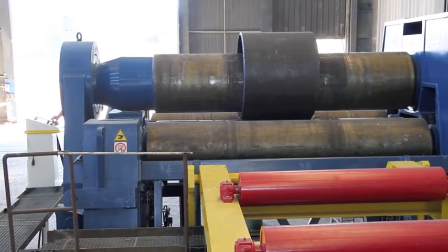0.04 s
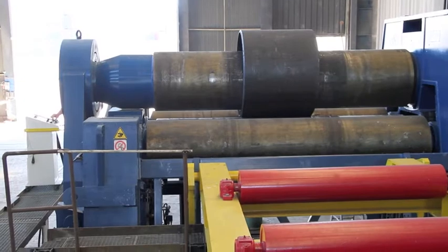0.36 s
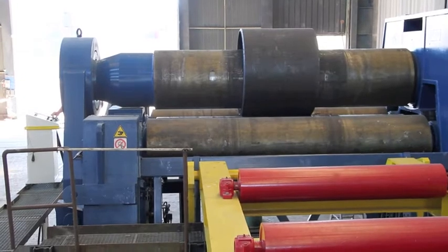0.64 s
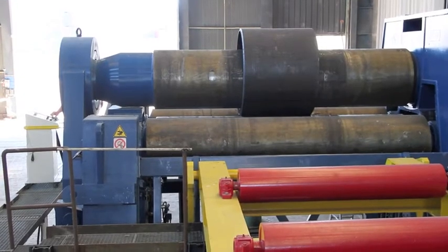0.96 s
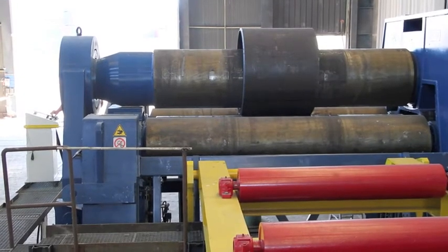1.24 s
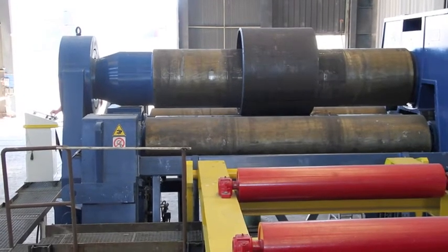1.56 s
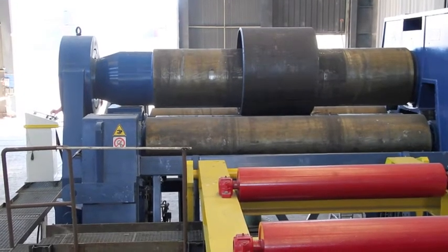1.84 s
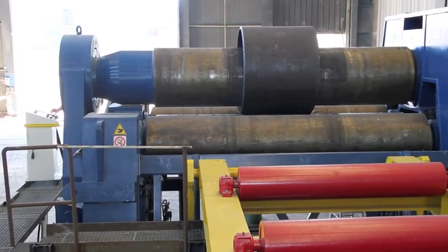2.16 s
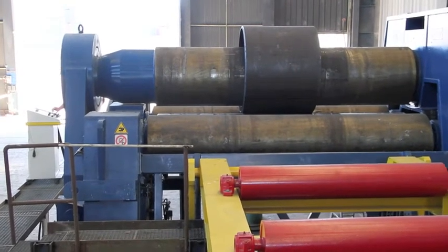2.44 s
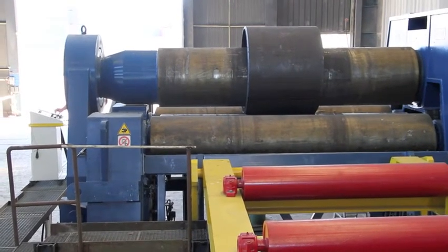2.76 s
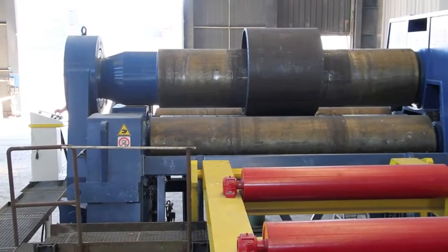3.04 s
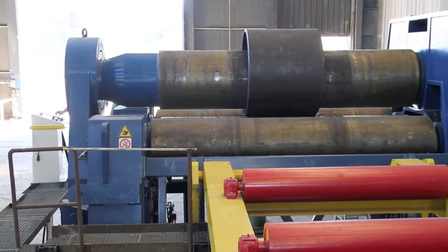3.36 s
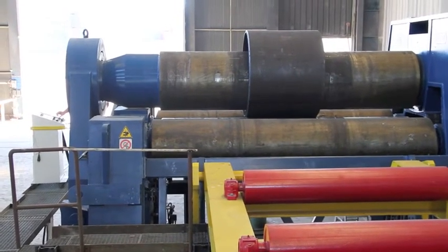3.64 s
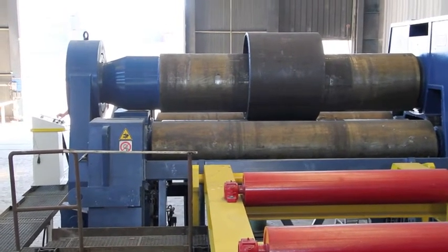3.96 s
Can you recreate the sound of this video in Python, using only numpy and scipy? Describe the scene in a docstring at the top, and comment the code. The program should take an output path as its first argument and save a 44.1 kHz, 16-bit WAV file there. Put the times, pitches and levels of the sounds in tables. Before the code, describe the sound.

A plate rolling machine's hydraulic pump gives a strong, steady hum with whining overtones throughout, a few metres away, over the fainter drone of a large factory hall. At about 0.6 seconds a soft hiss opens and stays, surging slightly around 2.3 seconds. From about 3.1 seconds to the end at 4, several very short, high, raspy squeaks fall in pitch and echo, the first being the loudest.

```python
"""A plate rolling machine in a large factory hall, the microphone a few metres from the rolls.
From the start its hydraulic pump gives a strong steady hum with a ladder of whining overtones;
a slower motor and other machines drone beneath, in the wash of the hall.
Within the first second a hiss opens, probably oil through a valve, and stays on.
Near the end come a few short falling squeaks, which echo in the hall."""
import sys
import numpy as np
from scipy import signal
from scipy.fft import rfft, irfft, next_fast_len
from scipy.io import wavfile
from scipy.ndimage import uniform_filter1d, map_coordinates

SR = 44100
rng = np.random.default_rng(int(sys.argv[2]) if len(sys.argv) > 2 else 0)


def int16_out(signal):
    """Quantize to a 16-bit WAV file."""
    q = np.round(np.clip(np.atleast_2d(signal).T, -1, 1) * 32767)
    wavfile.write(sys.argv[1], SR, q.astype(np.int16))


N = 176400


def amp(db):
    """Decibels to gain."""
    return 10 ** (np.asarray(db) / 20)


def unit(x):
    """Scale to rms 1."""
    return x / np.sqrt(np.mean(x ** 2) + 1e-20)


def curve(rows):
    """Points (t/s, value) joined by straight lines, one value per sample."""
    return np.interp(np.arange(N) / SR, *np.transpose(rows))


def wobble(rate):
    """A smooth random curve, rate knots a second."""
    return map_coordinates(rng.standard_normal(1000), [np.arange(N) * rate / SR + 2], mode="wrap")


def filtered(x, response):
    """Shape the spectrum of x by a gain that depends on frequency."""
    size = next_fast_len(N + SR // 2)
    return irfft(rfft(x, size) * response(np.fft.rfftfreq(size, 1 / SR)), size)[:N]


def rush(spectrum, patchy_db):
    """Noise of rms 1, coloured by rows of (f/Hz, level/dB), with patches of random gain."""
    bins = signal.stft(rng.standard_normal(N), nperseg=512)[2]
    patches = uniform_filter1d(rng.standard_normal(bins.shape), size=6, axis=0)
    patches = uniform_filter1d(patches, size=14, axis=1)
    noise = signal.istft(bins * amp(patchy_db * unit(patches)), nperseg=512)[1][:N]
    f, db = np.transpose(spectrum)
    return unit(filtered(noise, lambda hz: amp(np.interp(np.log(hz + 1), np.log(f + 1), db))))


def turning(hz, spread_hz):
    """Phase of something that turns at a slightly unsteady rate."""
    return 2 * np.pi * np.cumsum(hz + spread_hz * wobble(5.1)) / SR


def tone(phase, db, waver_db):
    """One partial of rms level db that wavers as it crosses the hall."""
    return np.sqrt(2) * amp(db + waver_db * wobble(6.86)) * np.sin(phase + 2 * np.pi * rng.random())


def hall():
    """The diffuse wash of all the machines in the hall, swelling slightly now and then."""
    # colour of the wash: f/Hz, relative level/dB
    colour = [(25, -80.5), (60, -68), (110, -61), (150, -52), (200, -52), (330, -50.5), (450, -53),
              (700, -56.5), (1100, -55.5), (1500, -58), (2100, -60), (2700, -64), (3600, -67), (5000, -73),
              (8000, -78), (12000, -79.5), (15500, -91)]
    # course of the wash: t/s, level/dB
    levels = [(0, -22.5), (1.0, -23), (1.04, -20.8), (1.3, -22.5), (2.3, -22.5), (3.1, -22), (3.6, -22),
              (3.71, -20.5), (3.76, -22.5), (3.9, -20.5), (4, -20.5)]
    return amp(curve(levels) + 0.27 * wobble(8)) * rush(colour, patchy_db=0.3)


def machinery(motor_hz=46.1):
    """A slow motor hums at multiples of its shaft rate; other machines drone at their own pitches."""
    # motor partials: multiple of the shaft rate, level/dB
    orders = [(1, -52), (2, -44.5), (3, -40)]
    # tones of the other machines: f/Hz, level/dB
    drones = [(155, -40), (170.5, -32.5), (225, -42), (616, -45.5), (808.8, -36.5), (938, -45.5)]
    shaft = turning(motor_hz, spread_hz=0.2)
    motor = sum(tone(order * shaft, db, waver_db=0.5) for order, db in orders)
    return motor + sum(tone(turning(hz, spread_hz=0.51), db, waver_db=2) for hz, db in drones)


def valve(attack_s=0.061, release_s=0.08):
    """A hiss that opens and follows the flow, with surges of brighter fizz on top."""
    # colour of the hiss: f/Hz, relative level/dB
    hiss_colour = [(1200, -86), (3600, -74.5), (5000, -74), (6500, -76.5), (8000, -78), (10000, -78),
                   (12000, -81), (13500, -87), (15300, -96.5)]
    # course of the hiss: t/s, level/dB
    hiss_levels = [(0, -38), (.3, -62), (.58, -48), (.68, -39), (.82, -32.5), (.95, -33), (1.45, -34.5),
                   (2.22, -34), (2.38, -31), (2.72, -33), (3.06, -34.5), (3.15, -32.5), (3.3, -33),
                   (3.55, -34.5), (4, -32.5)]
    # colour of the fizz: f/Hz, relative level/dB
    fizz_colour = [(4000, -22), (7000, -6), (11300, -1), (13500, -10), (15500, -25)]
    # surges of fizz: t/s, length before release/s, level/dB
    surges = [(0.618, .22, -38), (2.25, 0.48, -42), (3.08, .11, -39)]
    t = np.arange(N) / SR
    fizz_gain = np.zeros(N)
    for start, length, db in surges:
        rise = (t - start) / attack_s
        fall = 1 + (start + length - t) / release_s
        fizz_gain += amp(db) * np.clip(np.minimum(rise, fall), 0, 1)
    hiss = amp(curve(hiss_levels) + 0.27 * wobble(14)) * rush(hiss_colour, patchy_db=0.6)
    return hiss + fizz_gain * rush(fizz_colour, patchy_db=1.7)


def squeaks(fall_octaves=0.244):
    """Short, rasping, falling whistles that swell and break off."""
    # squeaks: t/s, length/s, starting f/Hz, whistle level/dB, rasp against whistle/dB
    events = [(3.149, 0.031, 3330, -22, -8), (3.196, 0.0228, 3400, -28, 2), (3.272, 0.0326, 3200, -31.5, 4),
              (3.346, 0.029, 3250, -30, -6), (3.488, .03, 3300, -33.5, 4), (3.518, 0.0246, 3380, -28.5, -7),
              (3.692, .035, 3300, -33, 1), (3.86, .025, 3100, -33, -7)]
    # colour of the rasp: f/Hz, relative level/dB
    rasp_colour = [(1500, -27), (2130, -1), (2350, -3), (2600, -1), (3050, -8), (3600, -12), (4020, -8),
                   (5000, -29)]
    out = np.zeros(N + SR)
    rasp = rush(rasp_colour, patchy_db=-2.5)
    jitter = 1 + 0.0094 * wobble(400)
    for start, length, hz, db, rasp_db in events:
        progress = np.linspace(0, 1, int(length * SR))
        at = round(start * SR) + np.arange(len(progress))
        envelope = np.interp(progress, [0, 0.8, 1], [0, 1, 0]) ** 0.48
        pitch_hz = hz * jitter[at] * 2 ** (-fall_octaves * progress)
        whistle = np.sqrt(2) * np.sin(2 * np.pi * np.cumsum(pitch_hz) / SR)
        out[at] += amp(db) * envelope * (whistle + amp(rasp_db) * rasp[at])
    return out[:N]


def echo(x, gain_db=1, t60_s=1.7, delay_s=0.017):
    """The long answer of the hall's walls, reaching the microphone just after the direct sound."""
    t = np.arange(2 * SR) / SR
    tail = rng.standard_normal(len(t)) * amp(-60 * t / t60_s) * (t > delay_s)
    return amp(gain_db) * signal.fftconvolve(x, tail / np.linalg.norm(tail))[:N]


def pump(pumping_hz=249.6, hum_gain_db=0.5, whine_gain_db=-0.5):
    """The hydraulic pump's pressure ripple: one strong hum and weaker overtones locked to it."""
    # pump partials, the hum first: multiple of the pumping rate, level before gain/dB
    orders = [(1, -15), (3, -45.5), (4, -29.5), (6, -32.5), (7, -46.5), (8, -48), (9, -34.6), (11, -44),
              (13, -44.5), (15, -44), (16, -52.5), (17, -50), (20, -54), (26, -55)]
    # slight swells and dips of the hum: t/s, relative level/dB
    swells = [(0.04, -15), (2.2, -14.5), (2.33, -15.5), (2.39, -14), (2.77, -16), (3.09, -15.5),
              (3.13, -13.5), (3.22, -16), (3.89, -14), (3.96, -14.5)]
    phase = turning(pumping_hz, spread_hz=0.027)
    swell_db = curve(swells) - curve(swells).mean()
    hum = tone(phase, orders[0][1] + hum_gain_db + swell_db, waver_db=0.05)
    whine = sum(tone(order * phase, db + whine_gain_db, waver_db=0.27) for order, db in orders[1:])
    return hum + whine


def scene():
    """The factory hall in mono, a few metres from the rolls."""
    squeak = squeaks()
    return (pump() + machinery() + hall() + valve() + squeak + echo(squeak))[None]


def record(dry, top_hz=15750):
    """The microphone passes nothing above its band limit."""
    return np.array([filtered(channel, lambda hz: hz < top_hz) for channel in dry])


dry = scene()
out = record(dry)
int16_out(out)
```